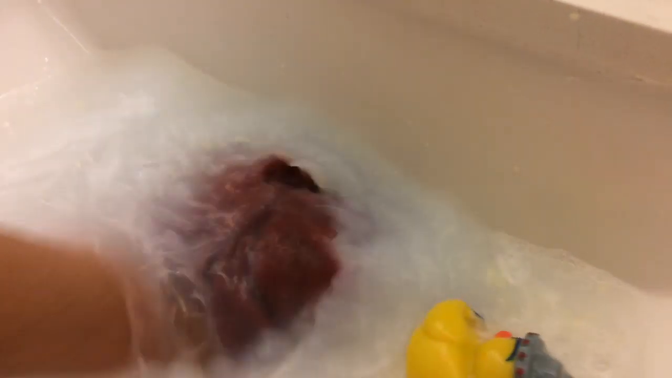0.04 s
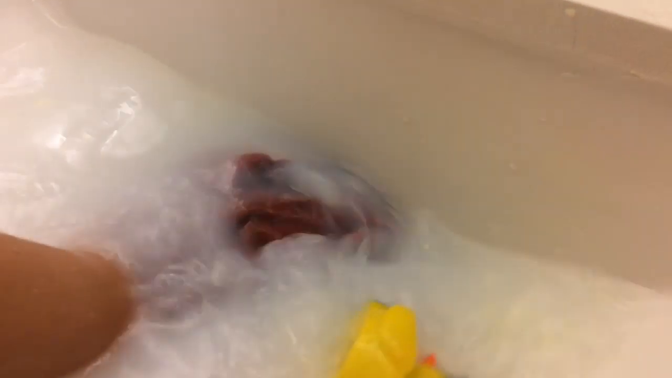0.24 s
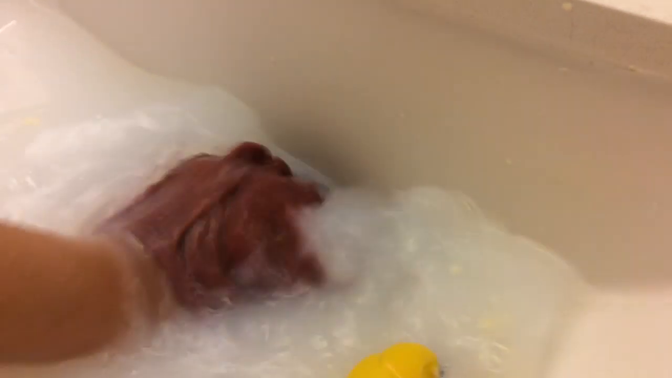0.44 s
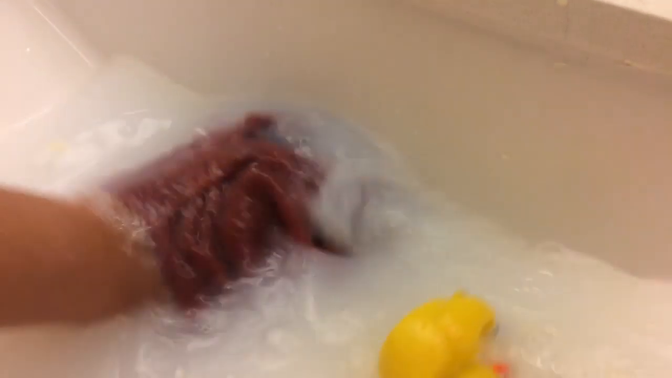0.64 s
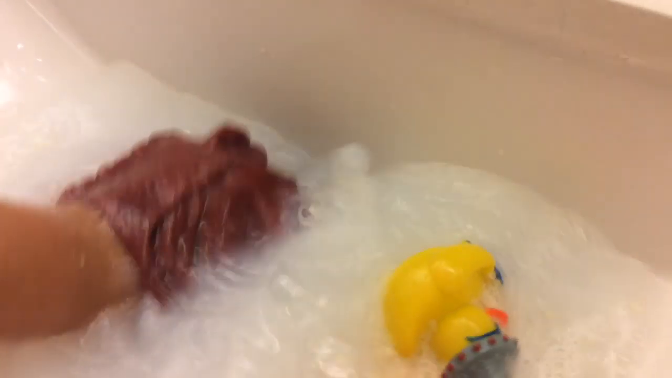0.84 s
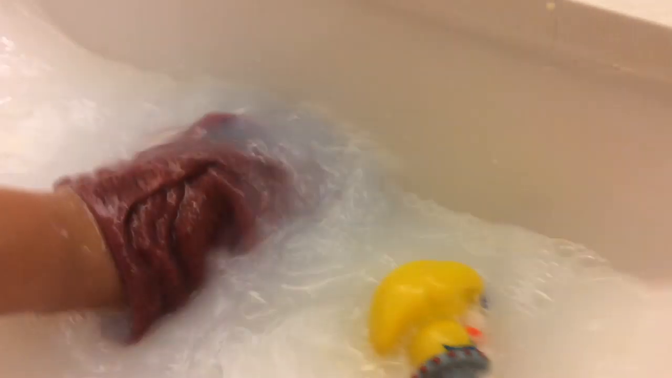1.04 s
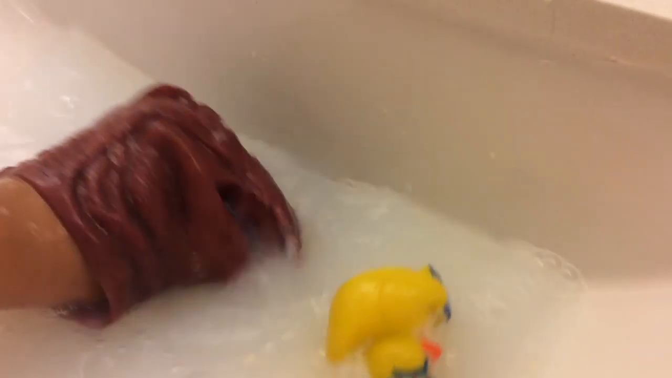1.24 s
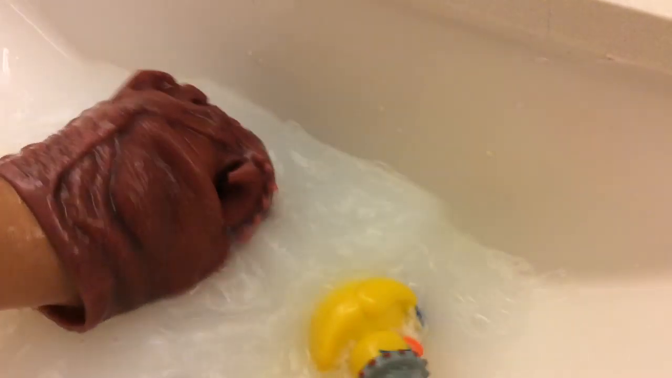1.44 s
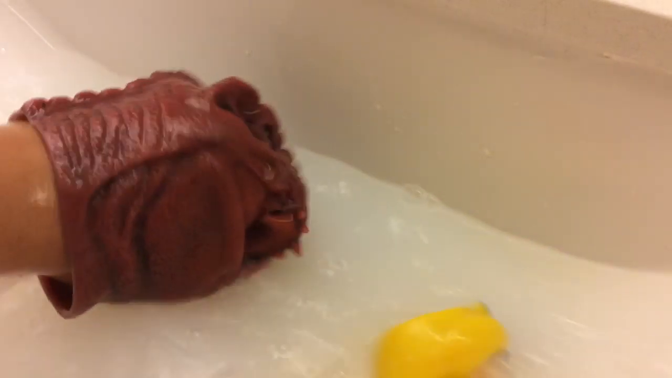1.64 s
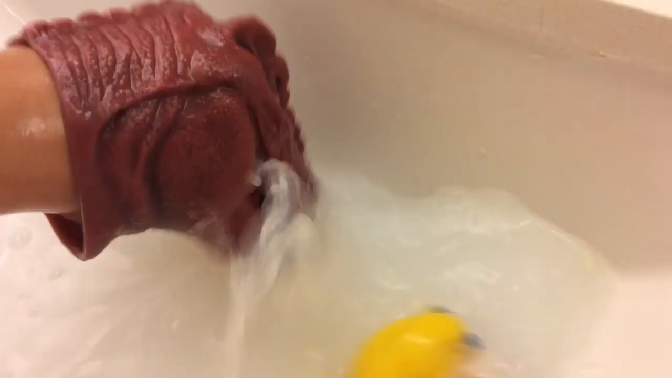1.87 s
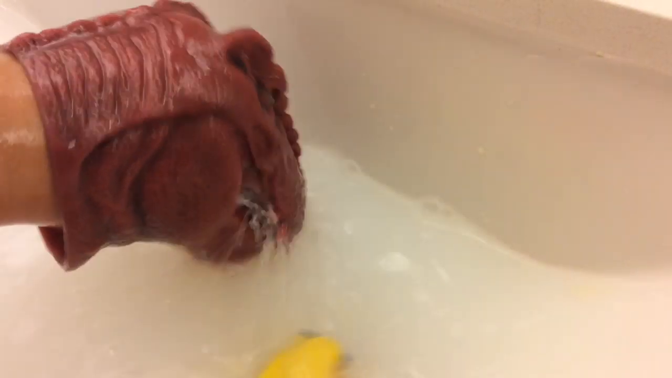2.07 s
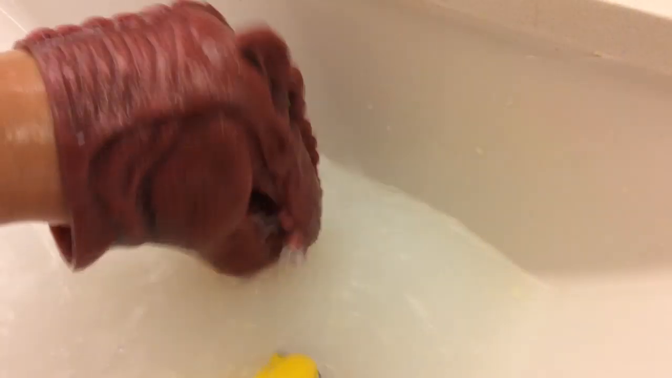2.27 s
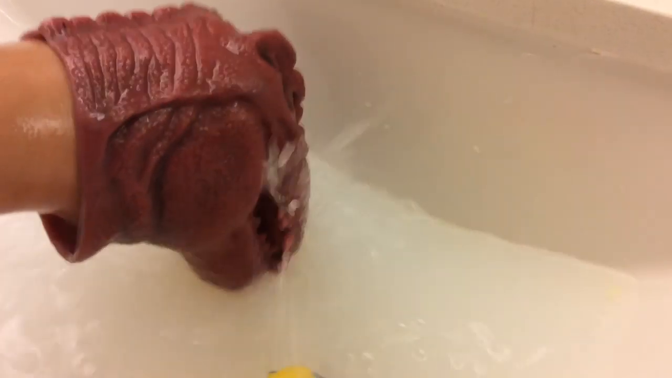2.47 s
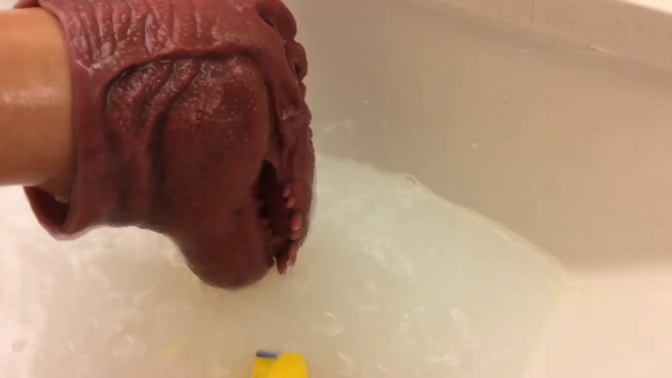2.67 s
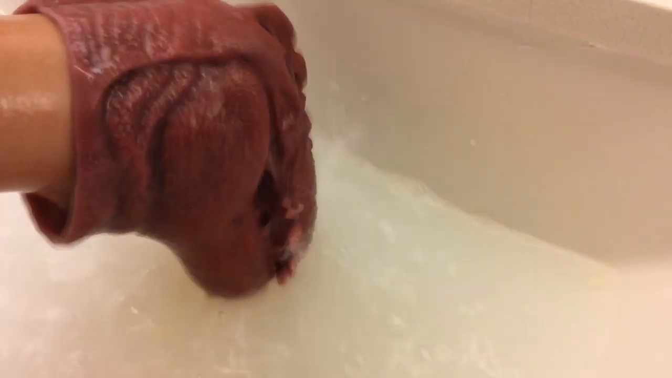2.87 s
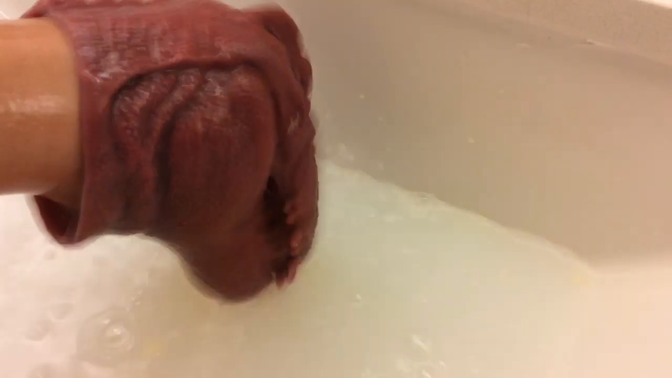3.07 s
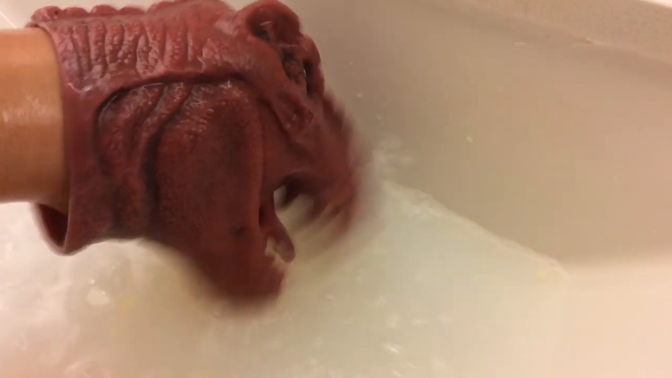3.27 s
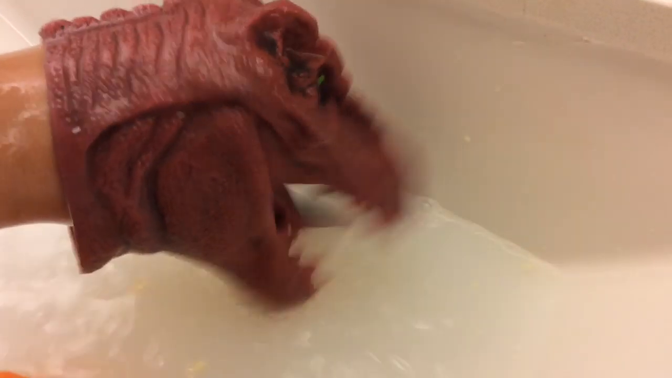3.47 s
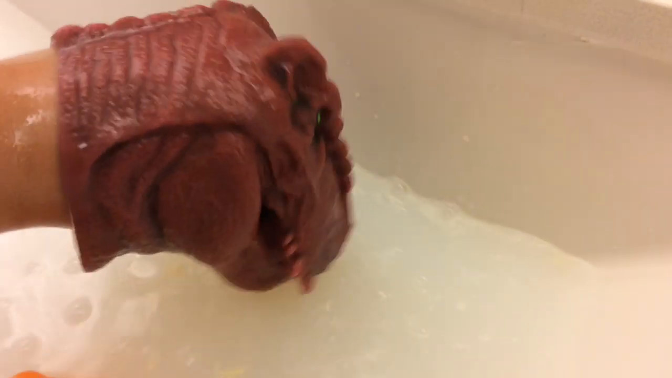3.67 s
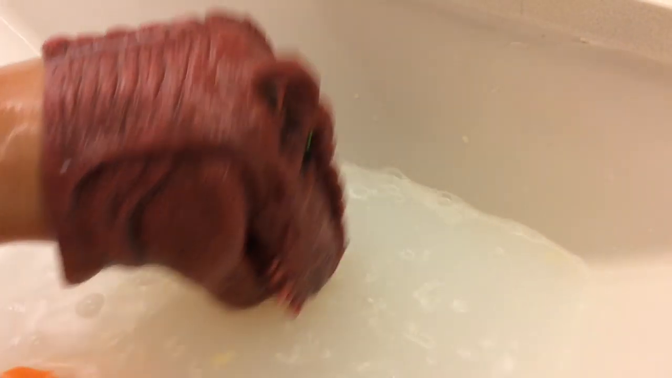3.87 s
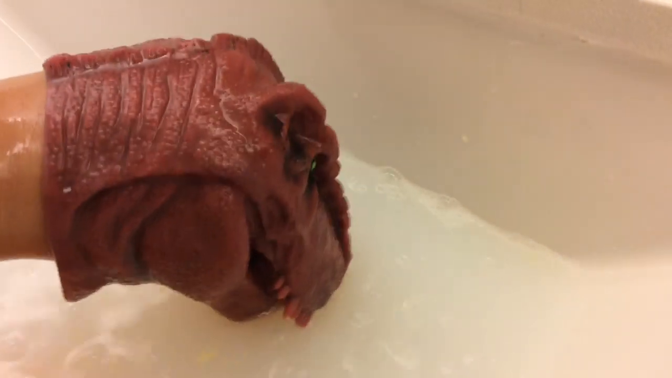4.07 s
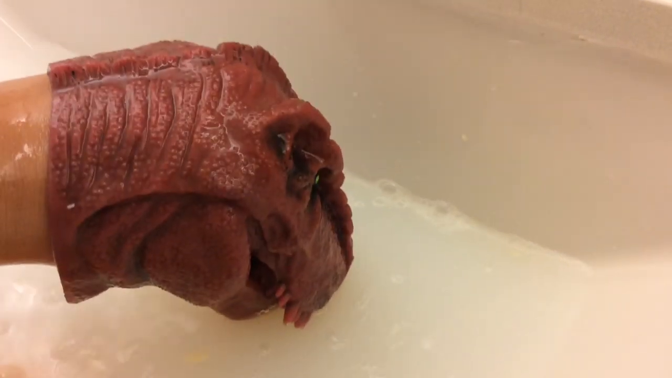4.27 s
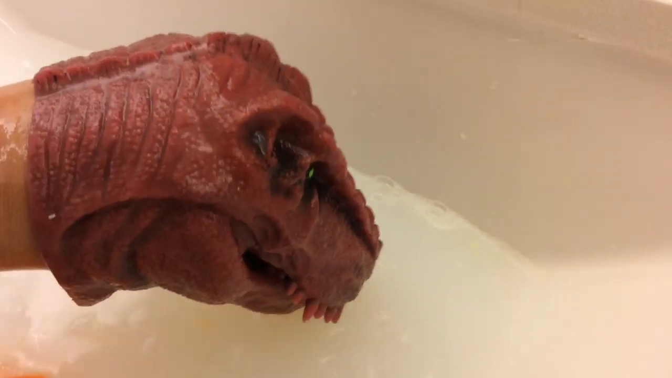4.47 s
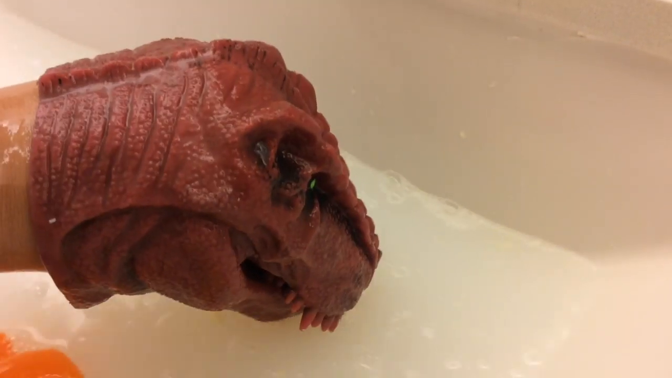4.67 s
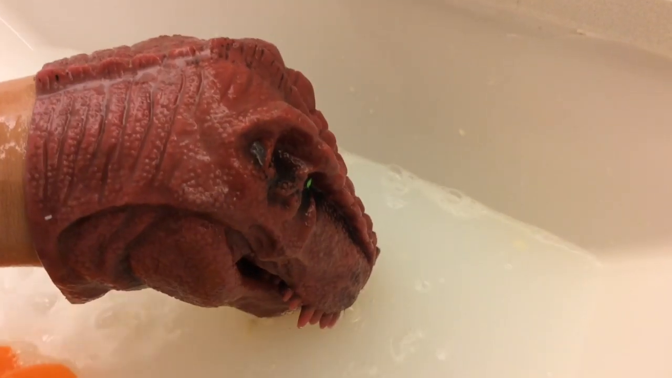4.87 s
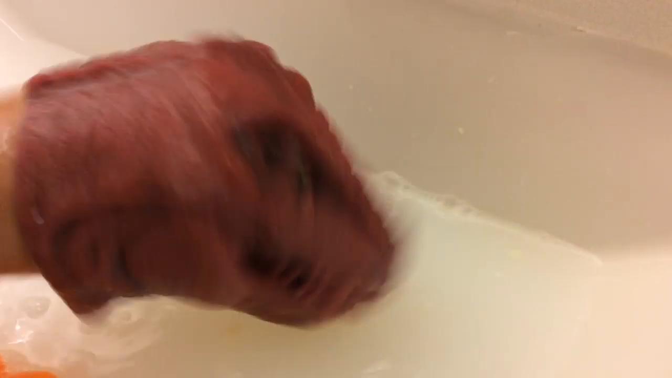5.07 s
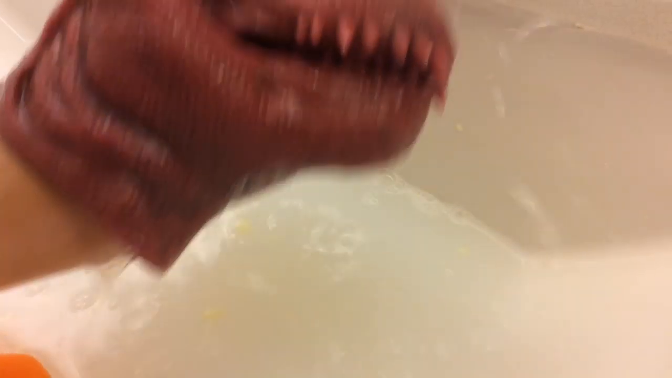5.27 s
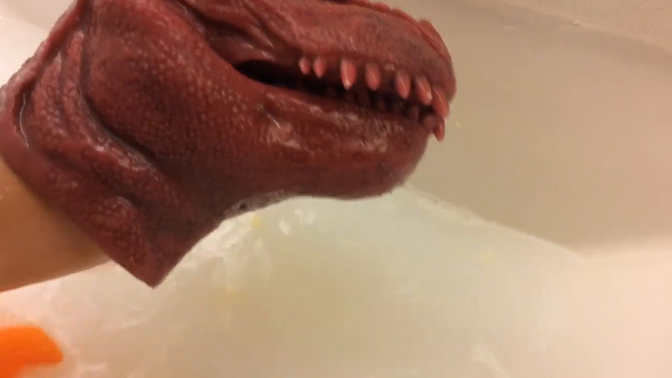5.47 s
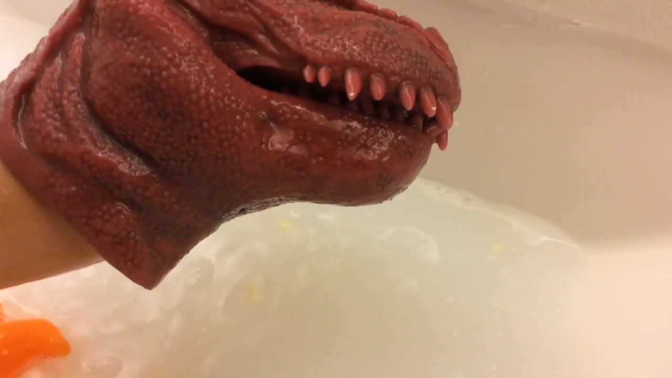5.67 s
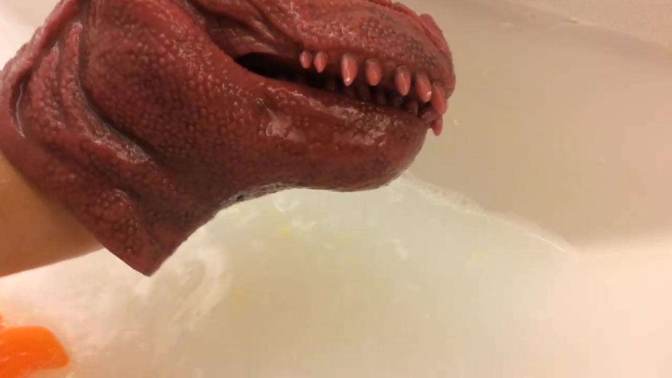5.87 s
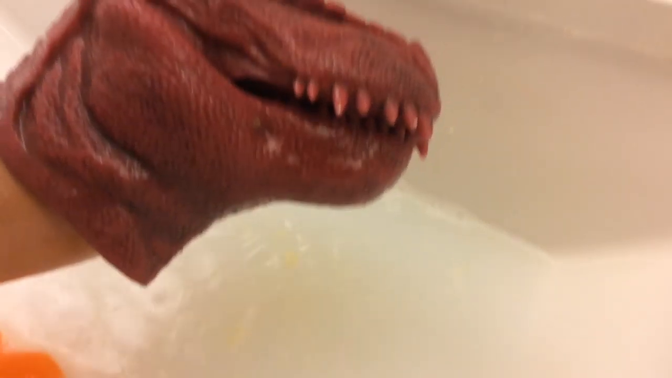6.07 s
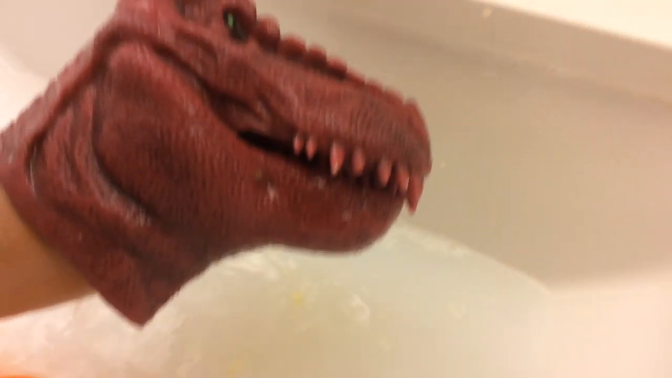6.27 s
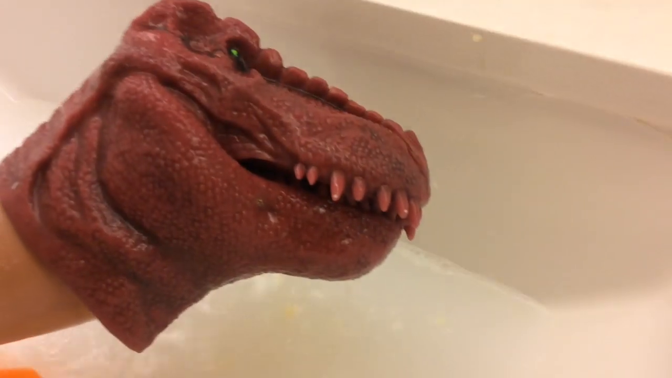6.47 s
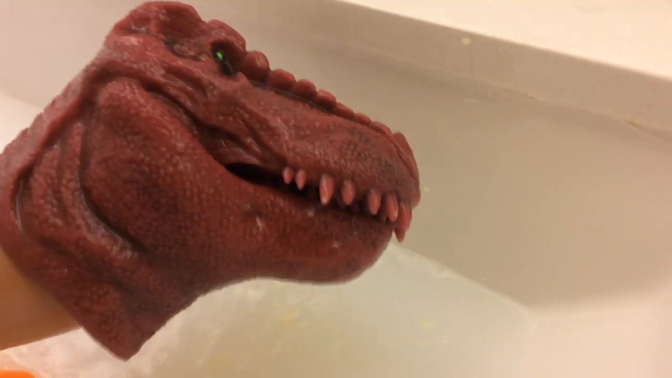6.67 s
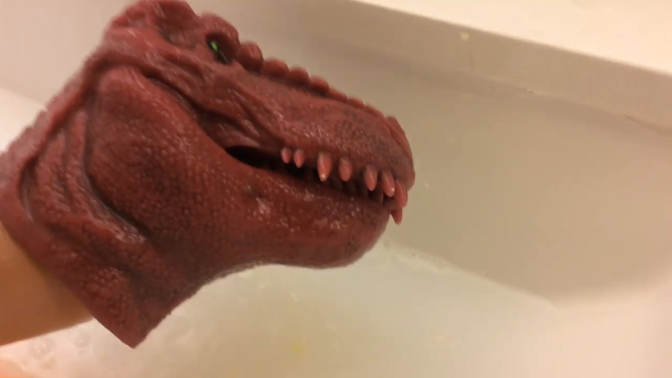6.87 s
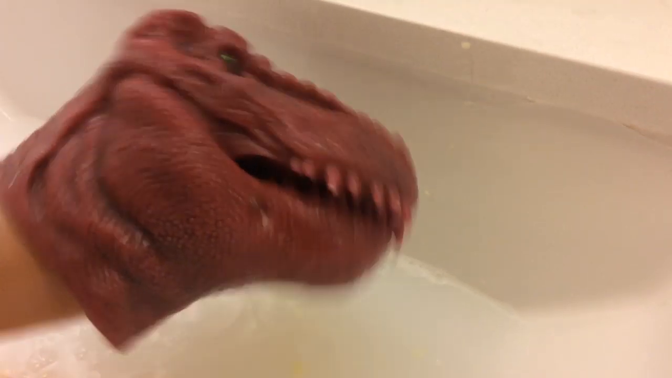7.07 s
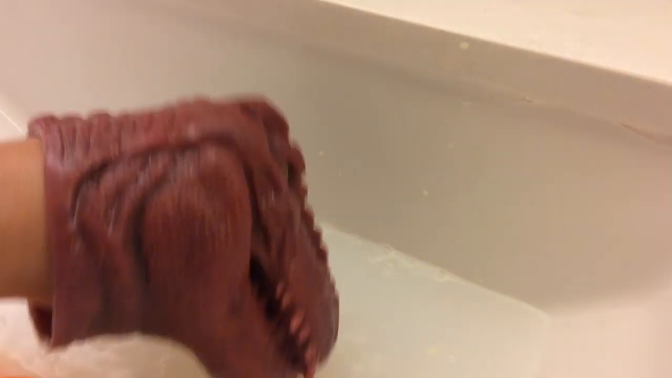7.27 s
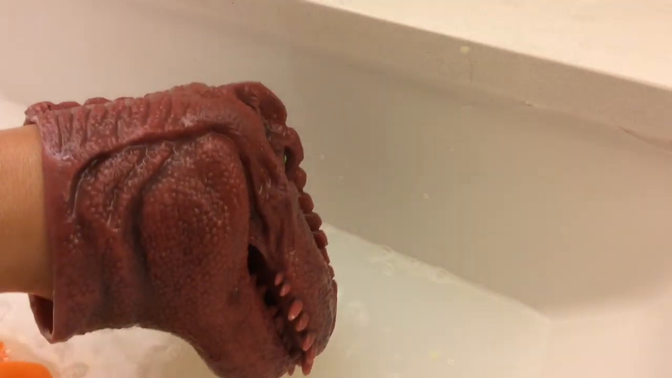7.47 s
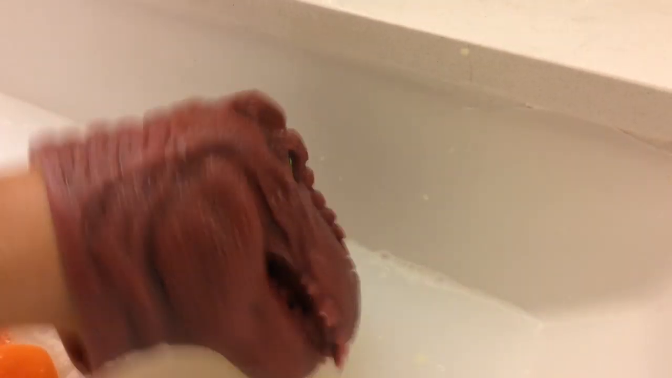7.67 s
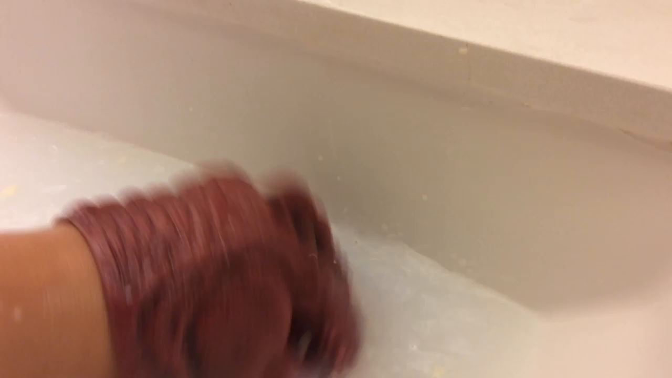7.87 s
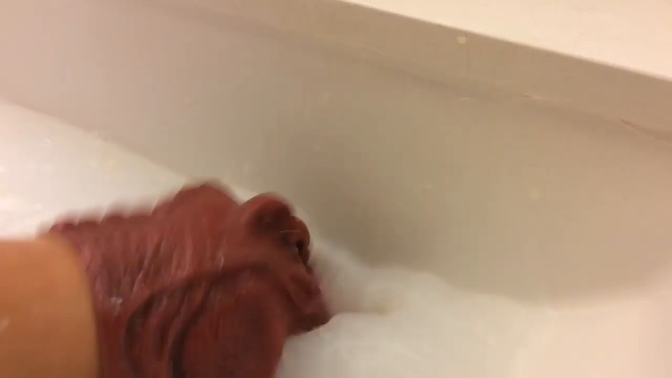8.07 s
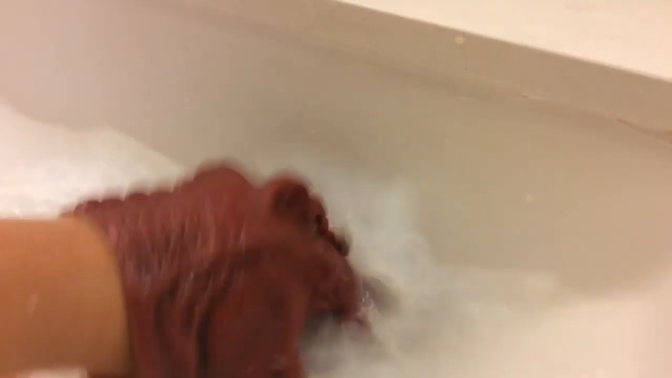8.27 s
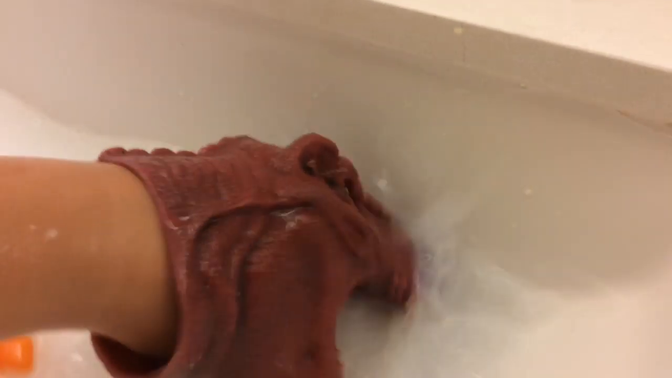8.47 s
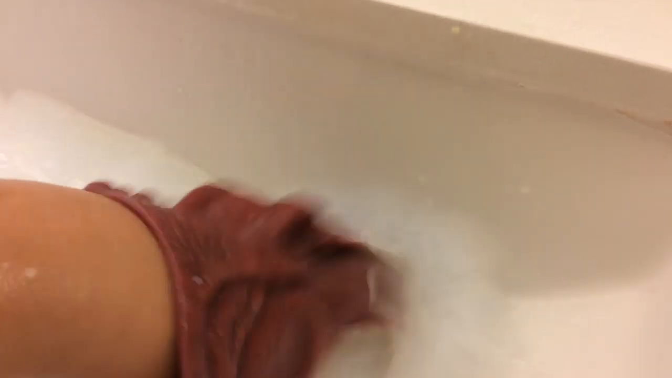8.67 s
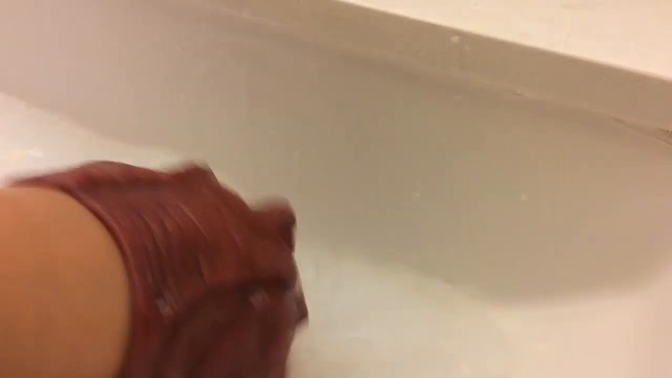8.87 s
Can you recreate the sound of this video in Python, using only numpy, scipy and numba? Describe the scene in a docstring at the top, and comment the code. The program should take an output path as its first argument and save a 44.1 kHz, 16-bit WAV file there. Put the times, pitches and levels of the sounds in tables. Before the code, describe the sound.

Splashing and deep plops in a small basin, eight wet rubbery smacks, a quiet spell of tiny drips, then sudden vigorous thrashing.

```python
"""Bath water churned by a hand in a rubber puppet: clouds of ringing bubbles make gurgle, wash and spray.
Larger trapped air pockets plop; rubber slaps the water as short bursts of crackling noise.
Raised, the wet jaws smack shut eight times and the puppet drips; then it plunges back in and thrashes.
Wall echoes and standing waves of a hard basin and the decaying noise tail of a small bathroom follow.
Beneath lies a low ventilation rumble of filtered noise."""
import sys
import numpy as np
from scipy import signal
from scipy.fft import rfft, irfft
from scipy.io import wavfile
from scipy.ndimage import uniform_filter1d
from numba import njit

SR = 44100
rng = np.random.default_rng(int(sys.argv[2]) if len(sys.argv) > 2 else 0)


def to_wav(sig):
    """Store sig (one row per channel, or 1-D mono) as 16-bit WAV at the path in sys.argv[1].

    Samples outside -1..1 are clipped; the rate is SR.
    """
    pcm = np.clip(np.atleast_2d(sig), -1, 1) * 32767
    pcm = np.round(pcm).astype(np.int16)
    wavfile.write(sys.argv[1], SR, pcm.T)  # frames by channels


N = 394254
T = np.arange(N) / SR  # t/s

# All levels are relative to the mix ahead of the room.
# strokes of the puppet through the water: [t/s, length/s, gurgle level/dB, spray level/dB]
STROKES = [(0.077, 0.055, -40, -51.5), (0.144, 0.022, -29.5, -36), (0.172, 0.1, -43, -44.5),
           (0.312, 0.026, -34, -58), (0.382, 0.071, -44.5, -54.5), (0.523, 0.086, -38, -43),
           (0.665, 0.051, -44, -55.5), (0.742, 0.028, -38, -44), (0.898, 0.054, -40, -47),
           (1.065, 0.12, -45.5, -62.5), (1.544, 0.034, -43.5, -43.5), (1.769, 0.095, -34.5, -34.5),
           (1.901, 0.038, -32.5, -33.5), (2.01, 0.065, -61, -43), (2.067, 0.013, -35, -33.5),
           (2.271, 0.024, -36.5, -36), (7.801, 0.067, -48.5, -38), (7.893, 0.049, -32.5, -37),
           (8.061, 0.044, -26.5, -30.5), (8.138, 0.045, -35.5, -57), (8.193, 0.042, -26, -32.5),
           (8.29, 0.081, -38.5, -37), (8.353, 0.074, -24, -31.5), (8.467, 0.024, -32, -33),
           (8.533, 0.03, -30, -30), (8.569, 0.032, -25.5, -34), (8.625, 0.027, -28.5, -31),
           (8.728, 0.036, -34.5, -35), (8.768, 0.059, -27, -30), (8.886, 0.05, -26.5, -30)]
# a bow wave ahead of each stroke and a churning wake behind it; levels relative to the stroke
BOW_S, BOW_GURGLE_DB, BOW_SPRAY_DB = 0.034, -9, -15.5
WAKE_S, WAKE_GURGLE_DB, WAKE_SPRAY_DB = 0.07, -17, -12.5
# large air pockets pinching off: [t/s, initial f/Hz, peak level/dB, cycles until 60 dB down]
PLOPS = [(0.054, 703, -25.5, 19), (0.079, 1255, -30.5, 31), (0.09, 271, -17, 27), (0.11, 318, -8, 6),
         (.132, 375, -9, 9), (.151, 856, -10, 46), (.23, 1750, -33, 47), (0.325, 1700, -26, 32),
         (.539, 497, -19, 5.5), (0.578, 2300, -26, 43), (0.603, 1115, -19.5, 24), (0.667, 1890, -29, 35),
         (0.743, 1350, -22, 23), (.754, 700, -8.5, 6.5), (.755, 350, -18, 20), (.928, 1086, -22.5, 21),
         (1.147, 740, -11.5, 2), (1.53, 1550, -20.5, 6), (1.557, 995, -23, 11), (1.774, 2570, -18, 39),
         (1.775, 1270, -13.5, 5.5), (1.79, 740, -3.5, 2.5), (1.845, 1200, -21, 16),
         (1.905, 1230, -23.5, 15), (2.072, 1070, -22.5, 52), (2.132, 1610, -16.5, 18),
         (2.281, 1510, -20.5, 12), (2.362, 544, -31, 10.5), (2.543, 2450, -12, 11), (2.757, 610, -19, 2),
         (3.677, 523, -20, 11), (7.87, 370, -19, 12), (7.928, 388, -13.5, 6.5), (7.948, 1650, -22, 18),
         (8.037, 1310, -24, 26), (8.064, 1420, -20.5, 20), (8.079, 522, -14.5, 16.5),
         (8.097, 358, -18.5, 11.5), (8.209, 594, -26, 20), (8.227, 955, -20.5, 30), (8.246, 680, -26, 21),
         (8.353, 1450, -21.5, 50), (8.379, 1330, -15.5, 19), (8.39, 496, -16.5, 16), (8.431, 710, -18, 16),
         (8.485, 933, -17.5, 25), (8.486, 2600, -4, 9.5), (8.532, 1490, -20.5, 30), (8.588, 406, -23.5, 22),
         (8.723, 1060, -22.5, 16), (8.799, 1270, -12, 10), (8.888, 2194, -15, 31), (8.91, 973, -17, 57)]
PLOP_RISE, SHALLOW_HZ = 0.27, 1494  # fractional pitch rise of a shallow pocket; f from which it is shallow
# rubber slapping on the water: [t/s, level/dB, cavity resonance f/Hz, length before the fall/s]
SLAPS = [(0.146, -35, 3200, 0.017), (0.745, -24.5, 2670, 0.0026), (0.94, -34.5, 9100, 0.0094),
         (1.048, -27.5, 4500, 0.0024), (1.867, -19, 5860, 0.0037), (7.793, -32, 4130, 0.0064),
         (7.87, -20, 3770, 0.0026), (7.947, -17.5, 6240, 0.0012), (8.038, -21, 9400, 0.0024),
         (8.371, -17.5, 3120, 0.0086), (8.4, -21, 5340, 0.011), (8.468, -18, 11200, 0.0011),
         (8.586, -16.5, 6240, 0.0025), (8.617, -19, 5350, 0.0051), (8.791, -11, 2700, 0.00077),
         (8.836, -24, 4000, 0.0055), (8.882, -22, 6960, 0.0027)]
# jaws snapping shut: [t/s, clap level/dB, cavity resonance f/Hz, first lip touch level/dB,
# lead of the touch on the clap/s, level of the water in the mouth/dB]
SNAPS = [(2.129, -12, 5200, -15, 0.0038, -35), (2.342, -14, 4600, -36.5, .009, -40),
         (2.517, -10.5, 5940, -20, 0.0085, -32), (2.735, -16.5, 4540, -25, 0.0058, -40.5),
         (2.947, -16, 5900, -27.5, 0.0075, -39.5), (3.166, -12.5, 4600, -16, 0.0056, -47),
         (3.392, -13.5, 5340, -15, 0.0074, -45), (3.678, -18.5, 6100, -23.5, 0.0082, -40)]
CLAP_S, CLAP_FALL_S, CLAP_RISE_S = 0.0035, 0.0017, 0.0016
TOUCH_S, TOUCH_FALL_S, TOUCH_RISE_S, TOUCH_HZ = 0.0013, 0.0009, 0.00096, 8480
# closing jaws squeeze out water, less and less as the mouth empties; the clap squirts out the rest
SQUEEZE_LEAD_S, SQUEEZE_S, SQUEEZE_DB, SQUEEZE_FALL_DB_PER_S = 0.036, 0.035, -42.5, 8
SQUIRT_LAG_S, SQUIRT_S = 0.0046, 0.035
MOUTH_GURGLE_DB = -4  # gurgle relative to spray
# water running off the lifted puppet: [t/s, length/s, spray level/dB]
RUNOFF = [(1.22, 0.52, -58.5), (2.557, 0.42, -54), (3.027, 0.55, -59.5), (5.147, 0.3, -62),
          (5.478, .6, -59.5), (6.13, 0.54, -58.5), (7.184, 0.12, -59.5)]
RUNOFF_GURGLE_DB = -2  # relative to spray
# single drops: [t/s, tick level/dB, bubble initial f/Hz, bubble peak level/dB]
DRIPS = [(1.369, -50, 2550, -29.5), (1.483, -46, 3600, -36), (1.733, -47, 2540, -33),
         (2.495, -30, 5600, -22), (2.685, -38, 5860, -23.5), (2.904, -37, 1473, -43),
         (3.58, -45, 3500, -33), (5.526, -39.5, 2490, -28.5), (5.57, -35, 3200, -35),
         (5.73, -44, 4340, -57), (5.781, -41.5, 2620, -36), (5.846, -47, 2510, -28),
         (5.884, -41.5, 3000, -26), (5.898, -64, 1740, -34), (5.93, -41.5, 1660, -41),
         (5.978, -39, 3800, -28), (5.987, -50, 1670, -38.5), (6.039, -38, 1610, -42),
         (6.114, -43.5, 2420, -48), (6.165, -58, 1910, -37), (6.199, -56, 1970, -52),
         (6.236, -68, 1880, -42), (6.3, -46, 3820, -31), (6.325, -34.5, 2380, -41), (6.396, -62, 1140, -36),
         (6.399, -64, 1710, -37), (6.425, -56, 1180, -36.5), (6.531, -42, 3190, -31.5),
         (6.56, -46, 4280, -28), (6.672, -62, 3250, -35), (6.91, -52, 8750, -15.5), (6.909, -53, 1840, -33),
         (6.923, -54, 3750, -33), (6.999, -53, 4160, -42), (7.039, -52, 1920, -34.5),
         (7.148, -41, 4000, -31), (7.209, -48, 9400, -31), (7.252, -39, 3130, -42), (7.302, -41, 4100, -34)]
# spectrum of slaps and smacks: [f/Hz, level/dB]
SMACK_COLOUR = [(150, -27), (500, 4), (1000, -16.5), (2000, -10), (3200, 2), (6000, -1.5), (10000, 0),
                (12500, -5), (16000, -8.5)]
# spectrum of spray and drop ticks: [f/Hz, level/dB]
SPRAY_COLOUR = [(1000, -21.5), (2500, 1), (4000, -0.5), (7000, -4.5), (9500, 1), (12000, -7.5),
                (16000, 0.5)]
# reflections off the basin walls: [mean delay/s, gain]
WALLS = [(.0013, 0.28), (.0031, -0.53), (0.014, 0.51)]
WALL_LOW_HZ = 501  # longer waves bend round the walls
# standing waves in the basin: [f/Hz, width/Hz, level/dB]
BASIN_MODES = [(343.2, 11.2, 5.5), (396.2, 5.6, 4), (518.8, 8.7, 4.5), (610, 29, -1.5), (716, 16, -8.5),
               (930, 14, -15), (1070, 23, -2), (1360, 81, 3.5)]
# ventilation spectrum, relative: [f/Hz, level/dB]
VENT = [(15, -47.5), (25, -31.5), (55, -8.5), (102, -10), (145, -1.5), (195, -7), (223, -13), (344, -25),
        (439, -23), (560, -19.5), (911, -24), (1160, -32.5), (1330, -27), (1700, -31.5), (16000, -52)]
VENT_DB = -48  # rms level of the broadband rumble
# room resonances excited by the rumble: [f/Hz, width/Hz, rms level/dB]
ROOM_MODES = [(143.5, 16, -56.5), (193.7, 3.7, -55.5), (264.7, 14, -61), (351, 46, -56.5),
              (510.5, 150, -65.5), (808.5, 52, -70), (1056, 78, -66)]


def sloshing():
    """Bubble acoustics: churned water sounds as the sum of many ringing bubbles, from glugs to spray."""
    gurgle_db, spray_db = sloshes().T[2:]
    glugs = swarm(gurgle_db, count=6, low_hz=394, high_hz=786, cycles=21.7,
                  spread_db=6.0, swell=0.78, rise=0.4, deepen=0.66)
    gurgle = swarm(gurgle_db, count=24, low_hz=805, high_hz=3283, cycles=24.4,
                   spread_db=4.0, swell=2.34, rise=0.35, deepen=0.7)
    wash = swarm(gurgle_db, count=115, low_hz=645, high_hz=3440, cycles=8,
                 spread_db=5.0, swell=1.23, rise=0.11, deepen=0.5)
    fizz = swarm(spray_db, count=140, low_hz=2782, high_hz=13070, cycles=27,
                 spread_db=4.5, swell=3.65, rise=0.24, deepen=0)
    spatter = swarm(spray_db, count=36, low_hz=3300, high_hz=14580, cycles=9,
                    spread_db=5.5, swell=1.0, rise=0, deepen=0)
    spray = colour(undb(2.0) * fizz + undb(-0.5) * spatter, SPRAY_COLOUR)
    return undb(-10.5) * glugs + undb(-3.0) * gurgle + undb(-4.5) * wash + spray


def sloshes():
    """Displacement: moving bodies set water in motion; rows of [t/s, length/s, gurgle/dB, spray/dB]."""
    rows = []
    for s, length_s, gurgle_db, spray_db in STROKES:
        rows.append((s - BOW_S, BOW_S, gurgle_db + BOW_GURGLE_DB, spray_db + BOW_SPRAY_DB))
        rows.append((s, length_s, gurgle_db, spray_db))
        rows.append((s + length_s, WAKE_S, gurgle_db + WAKE_GURGLE_DB, spray_db + WAKE_SPRAY_DB))
    for s, *_, water_db in SNAPS:
        squeeze_db = SQUEEZE_DB - SQUEEZE_FALL_DB_PER_S * (s - SNAPS[0][0])
        rows.append((s - SQUEEZE_LEAD_S, SQUEEZE_S, squeeze_db + MOUTH_GURGLE_DB, squeeze_db))
        rows.append((s + SQUIRT_LAG_S, SQUIRT_S, water_db + MOUTH_GURGLE_DB, water_db))
    for s, length_s, spray_db in RUNOFF:
        rows.append((s, length_s, spray_db + RUNOFF_GURGLE_DB, spray_db))
    return np.array(rows)


def swarm(level_db, count, low_hz, high_hz, cycles, spread_db, swell, rise, deepen):
    """Energy sharing: each slosh divides its energy among bubbles, pitched lower as the hollow opens."""
    s, length_s = sloshes().T[:2, :, None]
    level_db = level_db[:, None]
    when, pitch, ring, rank = rng.random((len(s), 4, count)).transpose(1, 0, 2)
    age = 4 / 3 * (np.arange(count) + when) / count  # in slosh lengths
    drift = 2 ** (deepen * (0.5 - age))  # deepen: octaves lost per slosh length
    hz = np.minimum(low_hz * (high_hz / low_hz) ** pitch * drift, SR / 3)
    turns = cycles * (0.5 + ring)
    # short, gentle sloshes favour a few bubbles; long, hard ones share more evenly
    plenty = np.clip(length_s / 0.06 * undb(0.6 * (level_db + 30)), 0.15, 1)
    # the water surges, then settles with a few stragglers
    surge = np.minimum(0.6 + 3 * age, 1) / (1 + age ** 8)
    spread = undb(-spread_db * np.log(0.02 + rank))  # dB per e-fold of rank
    size = surge * np.exp(-rank / plenty) * spread
    share = size ** 2 / np.sum(size ** 2, axis=1, keepdims=True)
    ring_energy = turns / hz / (4 * np.log(1000))  # of a decaying sine of peak 1
    peak = undb(level_db) * np.sqrt(share * length_s / ring_energy)
    starts = s + length_s * age
    return bubbles(starts.ravel(), hz.ravel(), turns.ravel(), peak.ravel(), rise=rise, swell=swell)


@njit
def bubbles(starts, hz, cycles, peak, rise, swell):
    """Damped oscillation: an air bubble builds up over `swell` cycles, decays and rises in pitch."""
    out = np.zeros(N)
    for k in range(len(starts)):
        first = int(starts[k] * SR)
        length = cycles[k] * SR / hz[k]
        turn = 0.0  # phase in cycles
        for i in range(min(int(length), N - first)):
            age = i / length
            turn += hz[k] * (1 + rise * age) / SR
            onset = 1 - np.exp(-(turn / swell) ** 2)
            decay = 1000 ** -age  # 60 dB over the whole length
            out[first + i] += peak[k] * decay * onset * np.sin(2 * np.pi * turn)
    return out


def plops():
    """Surface proximity: large pockets ring like bubbles; the higher, shallower ones glide up more."""
    out = np.zeros(N)
    for s, hz, db, cycles in PLOPS:
        rise = PLOP_RISE * min(hz / SHALLOW_HZ, 1.0)
        out += bubbles(np.array([s], float), np.array([hz], float), np.array([cycles], float),
                       undb([db]), rise=rise, swell=0.39)
    return out


def smacks():
    """Impact and cavity resonance: wet rubber tears a water film and rings the hollow behind it."""
    contacts = []
    for s, db, hz, length_s in SLAPS:
        contacts.append((s, db, hz, length_s, CLAP_FALL_S, CLAP_RISE_S))
    for s, clap_db, hz, touch_db, lead_s, _ in SNAPS:
        contacts.append((s - lead_s, touch_db, TOUCH_HZ, TOUCH_S, TOUCH_FALL_S, TOUCH_RISE_S))
        contacts.append((s, clap_db, hz, CLAP_S, CLAP_FALL_S, CLAP_RISE_S))
    out = np.zeros(N)
    for s, db, hz, length_s, fall_s, rise_s in contacts:
        film = burst(length_s, fall_s, rise_s)
        cavity = resonate(film, hz, hz / 4)
        add(out, s, undb(db) * 0.7 * (film + cavity))
    return colour(out, SMACK_COLOUR)


def burst(length_s, fall_s, rise_s):
    """Film rupture: tearing water gives crackly noise that builds up, then collapses exponentially."""
    t = T[:SR // 25]
    grain, size = rng.standard_normal((2, len(t)))
    crackle = undb(3.2 * unit(uniform_filter1d(size, size=16)))  # slow random level in dB
    build = np.minimum(t / rise_s, 1) ** 2
    collapse = np.exp(-np.maximum(t - length_s, 0) / fall_s)
    return unit(grain * crackle) * build * collapse


def dripping():
    """Drop impact: each drop ticks on the surface at a random pitch and traps a tiny ringing bubble."""
    s, tick_db, hz, ring_db = np.array(DRIPS).T.copy()
    ticks = np.zeros(N)
    for start, db in zip(s, tick_db):
        tick = burst(0.00045, fall_s=0.00086, rise_s=0.00025)
        tick_hz = 4000 + 5500 * rng.random()
        add(ticks, start, undb(db) * (0.84 * tick + 0.82 * resonate(tick, tick_hz, 1500)))
    rings = bubbles(s + 0.00075, hz, np.full(len(s), 24.0), undb(ring_db), rise=0.067, swell=1.8)
    sputtering = ragged(rings, width_hz=1200)
    return 1.1 * rings + 0.37 * sputtering + undb(5.0) * colour(ticks, SPRAY_COLOUR)


def ragged(x, width_hz):
    """Random amplitude modulation: breaking water makes a ring sputter, smearing its note over a band."""
    lowpass = signal.butter(2, width_hz / 2, fs=SR, output="sos")
    sputter = signal.sosfilt(lowpass, rng.standard_normal(N))
    return x * unit(sputter)


def basin(x):
    """Reflection and standing waves: walls echo with delays that drift as splashes move; modes ring on."""
    moments = np.linspace(0, T[-1], num=40)
    out = x.copy()
    for hz, width_hz, db in BASIN_MODES:
        out += undb(db) * resonate(x, hz, width_hz)
    bright = signal.sosfilt(signal.butter(1, WALL_LOW_HZ, "high", fs=SR, output="sos"), x)
    for delay_s, gain in WALLS:
        place = np.interp(T, moments, rng.uniform(-1, 1, len(moments)))
        moving_delay = delay_s * (1 + 0.3 * place)
        out += gain * np.interp(T - moving_delay, T, bright, left=0)
    return out + scatter(bright, db=-5.5, t60_s=0.053)


def scatter(x, db, t60_s):
    """Diffuse scattering: curved basin and rippled surface give dense echoes, renewed every 1/6 s."""
    t, hop = T[:SR // 16], SR // 6
    fade = np.exp(-np.log(1000) * t / t60_s) * np.minimum(t / 0.003, 1)
    out = np.zeros(N)
    for i in range(0, N, hop):
        echoes = unit(fade * rng.standard_normal(len(t))) / np.sqrt(len(t))  # unit energy
        add(out, i / SR, signal.fftconvolve(x[i:i + hop], echoes))
    return undb(db) * out


def bathroom(x, t60_low_s, t60_high_s, wet_db, flutter_db, flutter_s):
    """Reverberation: quick dense echoes of the nearest tiles and a room tail whose treble dies sooner."""
    t = T[:SR // 2]
    near, far = rng.standard_normal((2, len(t)))
    low = signal.sosfilt(signal.butter(2, 3500, fs=SR, output="sos"), far)
    onset = np.clip((t - 0.002) / 0.0093, 0, 1)

    def fade(t60_s):
        """Exponential decay: 60 dB in t60_s, after a short onset."""
        return np.exp(-np.log(1000) * t / t60_s) * onset

    tail = low * fade(t60_low_s) + (far - low) * fade(t60_high_s)
    flutter = near * fade(flutter_s)
    response = (undb(wet_db) * unit(tail) + undb(flutter_db) * unit(flutter)) / np.sqrt(len(t))
    response[0] += 1  # direct sound
    return signal.fftconvolve(x, response)[:N]


def ventilation():
    """Stationary noise: a steady broadband rumble, stronger at the room's resonances."""
    rumble = undb(VENT_DB) * unit(colour(rng.standard_normal(N), VENT))
    for hz, width_hz, db in ROOM_MODES:
        once = resonate(rng.standard_normal(N), hz, width_hz)
        rumble += undb(db) * unit(resonate(once, hz, width_hz))
    return rumble


def undb(db):
    """Logarithmic level: decibels to amplitude gain."""
    return 10 ** (np.asarray(db) / 20)


def unit(x):
    """Normalisation: scale to an rms of one."""
    return x / np.sqrt(np.mean(x ** 2) + 1e-18)


def colour(x, points):
    """Minimum-phase filtering: a causal response with the given spectrum [f/Hz, level/dB]."""
    hz, db = np.transpose(points)
    size = 4096
    grid_hz = np.fft.rfftfreq(size, 1 / SR)
    log_gain = np.log(undb(np.interp(np.log(grid_hz + 1), np.log(hz), db)))
    cepstrum = irfft(log_gain)[:size // 2]  # keeping the causal half gives minimum phase
    response = irfft(np.exp(2 * rfft(cepstrum, size) - cepstrum[0]))
    return signal.fftconvolve(x, response)[:len(x)]


def resonate(x, hz, width_hz):
    """Simple resonance: a second-order peak with gain 1 at its centre."""
    return signal.lfilter(*signal.iirpeak(hz, hz / width_hz, fs=SR), x)


def add(out, s, x):
    """Superposition: mix x into out from time s on."""
    i = max(int(s * SR), 0)
    out[i:i + len(x)] += x[:max(N - i, 0)]


def scene():
    """Superposition: all the water sounds in basin and bathroom, over the rumble."""
    water = basin(sloshing() + plops() + smacks() + dripping())
    heard = bathroom(water, t60_low_s=0.45, t60_high_s=0.25, wet_db=-20.5, flutter_db=-20.5, flutter_s=0.18)
    return (undb(3.0) * heard + ventilation())[None]


def record(dry):
    """Band limiting: the microphone drops the deepest bass, the recorder cuts the top of the treble."""
    thin = signal.sosfilt(signal.butter(2, 38, "high", fs=SR, output="sos"), dry)
    return signal.sosfilt(signal.ellip(10, 0.2, 70, 16000, fs=SR, output="sos"), thin)


dry = scene()
out = record(dry)
to_wav(out)
```